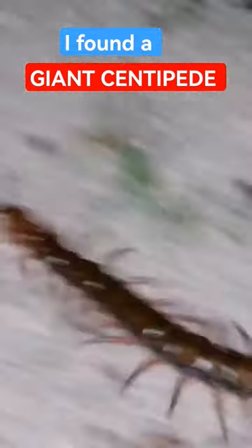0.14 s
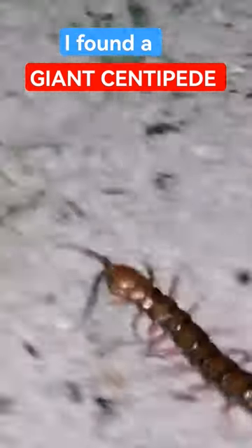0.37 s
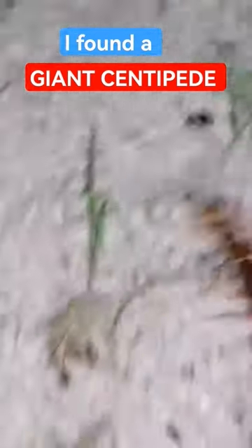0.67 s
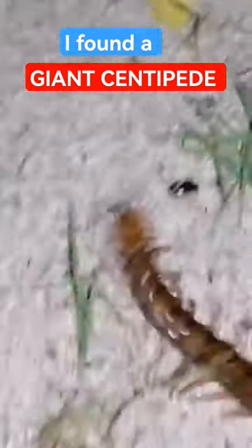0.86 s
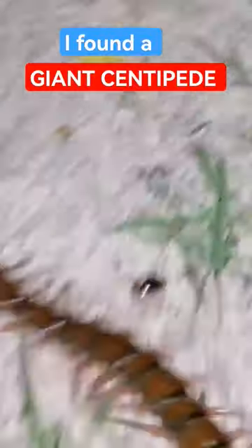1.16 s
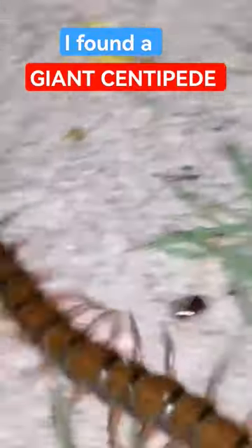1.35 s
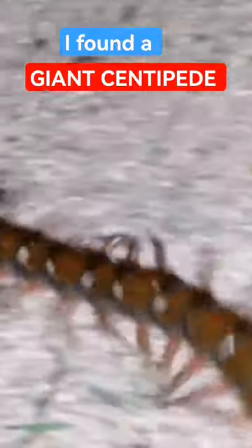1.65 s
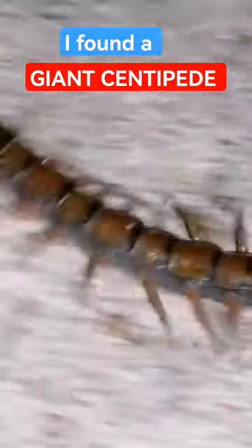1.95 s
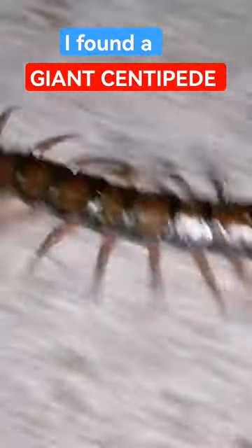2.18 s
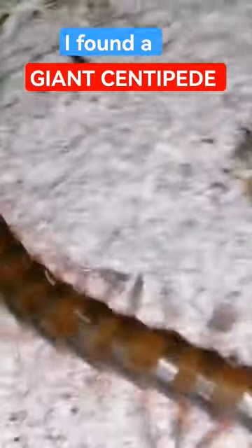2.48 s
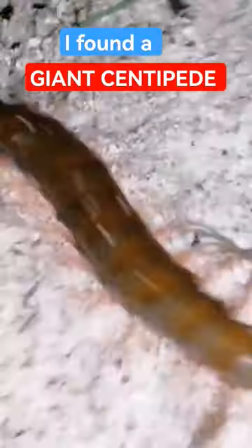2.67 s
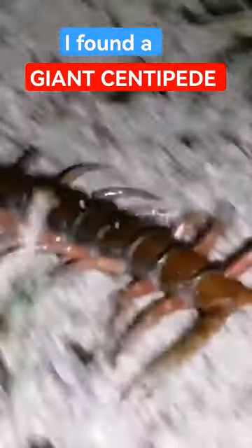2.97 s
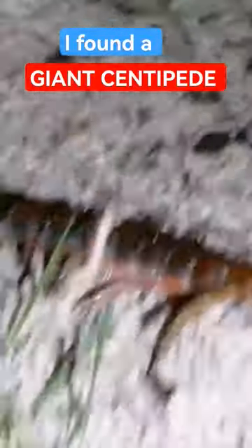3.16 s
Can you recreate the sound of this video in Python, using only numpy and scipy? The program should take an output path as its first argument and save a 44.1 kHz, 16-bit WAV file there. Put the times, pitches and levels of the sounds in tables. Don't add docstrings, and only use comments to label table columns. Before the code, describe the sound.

Shoe scuffs on gritty sand, close to a handheld phone outdoors at night. Crunchy drags with snapping grains come at 0.3-0.7 s and again at 1.1-1.3 s. From 1.4 to 2.5 s there are only weak drags, light breeze and soft handling thuds. Presses resume at 2.6 s, the hardest scrape hits at 2.84 s, then a dull thud at 2.94 s. Low traffic rumble, machine hum, thin hiss and very faint cricket chirps continue underneath; the sound is slightly muffled.

```python
import sys
import numpy as np
from scipy import signal
from scipy.fft import rfft, irfft
from scipy.io import wavfile

SR = 44100
rng = np.random.default_rng(int(sys.argv[2]) if len(sys.argv) > 2 else 0)


def materialize(psi):
    bounded = np.clip(np.atleast_2d(psi).T, -1, 1)
    quanta = np.round(bounded * 32767).astype(np.int16)
    wavfile.write(sys.argv[1], SR, quanta)


def field_ratio(decibels):
    return 10 ** (np.asarray(decibels, dtype=float) / 20)


N = 146412

# freq_hz, density_db_per_hz
RUMBLE_COLOUR = [(8.8, -44), (15, -9.5), (108, -1.5), (134, -1), (165, -3), (199, -8), (333, -21),
                 (538, -36.5), (900, -39.5), (1170, -53), (1980, -120)]
# time_s, level_db
BREEZE_LEVEL = [(0, -65), (.5, -68), (1.0, -57), (1.41, -50.5), (1.57, -64), (1.83, -54.5), (2.1, -62),
                (2.95, -58.5), (3.32, -61)]
# freq_hz, width_hz, level_db
HUM_LINES = [(68.6, 2, -56), (132.34, 2.3, -56), (88.1, 6.8, -60.5), (150.2, 3.3, -67), (208.9, 4.4, -67.5),
             (287.2, 5.5, -69), (325.3, 3, -71)]
# start_s, length_s, pitch_hz, level_db
CRICKET_CHIRPS = [
    (.16, .06, 7050, -77),
    (1.705, .09, 7060, -73),
    (2.18, .11, 7040, -78),
    (2.6, .05, 6750, -71),
]
# time_s, level_db
BUSTLE_LEVEL = [(0, -66), (.3, -64.5), (.5, -63.5), (1.04, -67), (1.3, -64), (1.85, -67.5), (2.0, -68.5),
                (2.17, -70), (2.33, -73), (2.48, -69.5), (2.6, -66.5), (2.95, -66.5), (3.32, -65.5)]
# freq_hz, density_db_per_hz
EARLY_AIR_COLOUR = [(240, -36), (400, -0.5), (613, -5.5), (906, -2.5), (1460, -4.5), (2820, -3),
                    (3970, -12.5), (6880, -8), (7400, -7.5), (9620, -26), (16300, -120)]
# freq_hz, density_db_per_hz
LATE_AIR_COLOUR = [(240, -18), (400, -3), (728, -25.5), (783, -19), (1410, -18), (1930, -12),
                   (4070, -18.5), (5190, -15.5), (7400, -13), (9620, -41), (16300, -120)]
# start_s, peak_db, pitch_hz, t60_s
HAND_THUDS = [(2.936, -30, 118, 0.055), (2.96, -38.5, 140, 0.13), (1.53, -40, 70, 0.17),
              (1.41, -40.5, 42, 0.18), (1.9, -37, 125, .1), (1.665, -44.5, 102, 0.088),
              (2.62, -45.5, 67, .2), (.66, -45, 81, 0.13), (1.3, -39.5, 130, 0.12), (1.815, -35, 90, 0.04),
              (1.96, -41, 65.5, .14), (1.085, -41, 77, 0.097), (.115, -44.5, 155, 0.1),
              (.488, -37, 96, 0.057), (0.12, -45, 64, 0.19), (1.375, -39.5, 150.5, 0.054),
              (1.745, -40.5, 100, 0.055), (1.425, -40, 140, 0.072), (1.47, -43.5, 190, .08),
              (3.0, -43.5, 80, 0.1), (3.145, -44, 169, 0.14)]
# start_s, peak_db, pitch_hz
GRAIN_SNAPS = [(.345, -45, 2000), (.3505, -45, 3000), (.4005, -45, 2500), (.419, -46, 1300),
               (.4305, -52, 3000), (.568, -32, 5000), (0.588, -38, 2900), (.596, -29.5, 2900),
               (.602, -43, 2600), (.658, -39, 5500), (1.128, -43, 2300), (1.1415, -34.5, 2500),
               (1.215, -46, 2200), (1.282, -45, 2300), (1.325, -48, 2500), (1.447, -52, 1150),
               (2.684, -50, 2400), (1.168, -43, 2500), (1.46, -47, 1500), (2.8206, -33.5, 3100),
               (2.834, -40, 5500), (2.8385, -30, 2300), (2.886, -50, 5540)]
# peak_s, length_s, pitch_hz, width_hz, level_db
SOLE_RINGS = [(0.338, 0.037, 1140, 89, -56.5), (0.369, 0.026, 1194, 89, -53), (.595, 0.045, 2900, 480, -46),
              (0.661, 0.053, 1020, 300, -53.5), (.597, 0.02, 1100, 250, -52), (.875, .04, 1580, 150, -66),
              (1.31, 0.087, 2310, 260, -60.5), (2.84, 0.016, 2250, 190, -45),
              (2.833, 0.022, 1170, 140, -51.5), (0.66, 0.041, 5500, 220, -64), (0.21, 0.35, 540, 270, -68),
              (0.383, 0.15, 575, 170, -61.5), (0.72, 0.11, 630, 220, -66), (1.125, 0.035, 540, 200, -63),
              (2.838, 0.025, 660, 200, -57.5), (2.7, 0.05, 2450, 250, -62), (2.645, .05, 2450, 230, -63.5),
              (2.635, .05, 3320, 230, -67.5), (2.83, .025, 3140, 440, -48), (2.78, .08, 2500, 300, -68),
              (.6, 0.045, 5500, 1100, -58), (1.465, 0.026, 1600, 500, -63.5), (0.356, .09, 1450, 830, -61),
              (0.557, 0.03, 3300, 210, -55), (.422, 0.033, 1200, 130, -56.5), (0.403, .05, 2300, 320, -61),
              (1.48, 0.15, 1340, 370, -62.5), (2.1, .3, 2300, 400, -77.5), (.585, 0.028, 3070, 400, -51.5),
              (1.2, 0.073, 1000, 210, -63.5), (1.136, 0.08, 2170, 870, -53),
              (1.205, 0.095, 2100, 700, -60.5), ]
# freq_hz, density_db_per_hz
GRIT_COLOUR = [(210, -47.5), (350, -19), (823, -7.5), (924, -9.5), (1840, -7.5), (2800, -5), (3910, -11),
               (5240, -2.5), (7400, -8.5), (9620, -46.5), (16300, -120)]
# peak_s, length_s, level_db, lows_db, highs_db (both relative to mids)
DRAGS = [(0.347, 0.086, -58, -3, -5.5), (.415, 0.093, -55.5, -2, 0), (0.592, 0.051, -51.5, -8, 4),
         (.665, 0.092, -57.5, -7, -0.5), (.8, 0.35, -76, 7, 8.5), (.975, 0.057, -76.5, -6, 8),
         (1.083, 0.062, -66.5, -11, -7), (1.135, 0.044, -49.5, -2.5, 1), (1.203, 0.073, -56.5, 0, -4),
         (1.318, 0.062, -60.5, -2.5, -5), (1.471, 0.3, -67, -1, -7.5), (1.652, 0.35, -69.5, -2.5, -4),
         (2.63, 0.1, -64.5, -16, -0.5), (2.8, 0.088, -65.5, -20, 1.5), (2.84, 0.032, -44.5, -11, 1),
         (2.882, 0.054, -54.5, -11, -1)]
# peak_s, length_s, level_db, lows_db, highs_db (both relative to mids)
SUDDEN_PRESSES = [(.2, 0.1, -70.5, 3, 1.5), (.562, 0.054, -56.5, -15, 6), (.6, 0.026, -50.5, -7, 0),
                  (.63, 0.022, -59.5, 2, -9), (.7295, 0.021, -58.5, 0.5, 2), (.87, 0.033, -68.5, 4.5, 6.5),
                  (.915, 0.021, -75, -8, 12), (1.102, 0.023, -59, -6, -6), (1.165, 0.047, -57, 2, 0),
                  (2.672, .016, -59.5, -7, 1), (2.61, 0.046, -71, -14, -4), (1.26, 0.08, -61.5, 1, -3),
                  (1.73, 0.13, -73, -4, 0.5), (2.52, 0.072, -73.5, -3, 4), (2.688, 0.029, -56.5, -8.5, 2.5),
                  (2.73, 0.061, -69, -3, -1), (2.822, 0.023, -47.5, -10.5, -3), (2.895, 0.076, -71, -11, 1)]
# freq_hz, gain_db
MIC_HOLLOW = [(20, -0.5), (3300, -0.5), (3500, 0), (3750, -3.5), (4200, -2), (4700, 0), (5500, 0.83),
              (20000, -0.5)]
# freq_hz, gain_db
IMAGE_RESPONSE = [(8000, 2), (11200, -1), (11700, -14), (12400, -15), (12900, -12), (14300, -13),
                  (15400, -14.5), (15900, -31)]

DRAG_RISE_SHARE, PRESS_RISE_SHARE = 0.7, 0.26


def rms_one(x):
    return x / np.sqrt(np.mean(x ** 2) + 1e-20)


def colour(x, points):
    hz, db = np.transpose(points)
    f = np.maximum(np.fft.rfftfreq(N, 1 / SR), 1)
    below_db = 30 * np.log2(np.minimum(f / hz[0], 1))
    above_db = -6 * np.log2(np.maximum(f / hz[-1], 1))
    gain_db = np.interp(np.log(f), np.log(hz), db) + below_db + above_db
    return rms_one(irfft(rfft(x) * field_ratio(gain_db), N))


def shade(x, points):
    f = np.maximum(np.fft.rfftfreq(2 * N, 1 / SR), 1)
    hz, db = np.transpose(points)
    gain_db = np.interp(np.log(f), np.log(hz), db)
    return irfft(rfft(x, 2 * N) * field_ratio(gain_db))[:, :N]


def cut(x, hz, kind, order=4):
    return signal.sosfilt(signal.butter(order, hz, kind, fs=SR, output="sos"), x)


def drift(rate_hz):
    r = np.exp(-2 * np.pi * rate_hz / SR)
    return rms_one(signal.lfilter([1], [1, -2 * r, r * r], rng.standard_normal(N + SR))[SR:])


def level_at(points):
    return np.interp(np.arange(N) / SR, *np.transpose(points))


def ring(x, hz, t60_s):
    r, w = field_ratio(-60 / (t60_s * SR)), 2 * np.pi * hz / SR
    return signal.lfilter([0, np.sin(w)], [1, -2 * r * np.cos(w), r * r], x + 1e-18)


def soft_hit(start_s, hz, yield_t60_s, t60_s):
    click = np.zeros(N)
    click[int(start_s * SR)] = 1
    body = ring(ring(click, hz, yield_t60_s), hz, t60_s)
    return body / np.abs(body).max()


def stroke(peak_s, length_s, rise_share=DRAG_RISE_SHARE):
    t = np.arange(N) / SR - peak_s
    side_s = length_s * np.where(t < 0, rise_share, 1 - rise_share)
    return np.exp(-np.abs(t / side_s) ** 1.9)


def traffic_rumble():
    level_db = -49.5 + 0.5 * drift(4.5)
    return field_ratio(level_db) * cut(colour(rng.standard_normal(N), RUMBLE_COLOUR), 45, "high")


def breeze():
    gust = cut(rng.standard_normal(N + SR), [15, 48], "band", order=2)[SR:]
    return field_ratio(level_at(BREEZE_LEVEL)) * rms_one(gust)


def machine_hum():
    t, steady_db = np.arange(N) / SR, 1
    out = np.zeros(N)
    for hz, width_hz, db in HUM_LINES:
        waver = rms_one(ring(rng.standard_normal(N + SR), hz, 2.0 / width_hz)[SR:])
        core = np.sin(2 * np.pi * (hz * t + rng.random()))
        out += field_ratio(db - 2.5) * (waver + field_ratio(steady_db) * core)
    return out


def cricket():
    pulses_per_s, t60_s, fade_db = 52, 0.026, 12
    out = np.zeros(N)
    for start_s, length_s, hz, db in CRICKET_CHIRPS:
        clicks = np.zeros(N)
        at_s = np.arange(0, length_s, 1 / pulses_per_s)
        clicks[((start_s + at_s) * SR).astype(int)] = field_ratio(db + 10.5 - fade_db * at_s / length_s)
        out += ring(ring(clicks, hz, t60_s), hz, t60_s) / (t60_s * SR / 40)
    return out


def clothes_bustle():
    turn_s, turn_length_s, patchy_db = 2.58, 1, 0.7
    late = np.clip((np.arange(N) / SR - turn_s) / turn_length_s + 0.5, 0, 1)
    white = rng.standard_normal(N)
    early_air = (1 - late) * colour(white, EARLY_AIR_COLOUR)
    late_air = late * colour(white, LATE_AIR_COLOUR)
    return rms_one(early_air + late_air) * field_ratio(level_at(BUSTLE_LEVEL) + patchy_db * drift(6.0))


def hand_thuds():
    out, yield_share = np.zeros(N), 0.46
    for start_s, db, hz, t60_s in HAND_THUDS:
        out += field_ratio(db) * soft_hit(start_s, hz, yield_share * t60_s, t60_s)
    return out


def grain_snaps():
    out, cycles = np.zeros(N), 4.2
    for start_s, db, hz in GRAIN_SNAPS:
        out -= field_ratio(db) * soft_hit(start_s, hz, cycles / hz, cycles / hz)
    return out


def grit():
    grains_per_s, spread_db, ring_cycles, smooth_share = 12000, 2.2, 14.0, 0.55
    patchy_db, patches_per_s, modes = 1.5, 11, 30
    sizes = field_ratio(spread_db * np.minimum(rng.exponential(1, N), 5)) * rng.choice([-1, 1], N)
    cracks = rms_one(sizes * (rng.random(N) < grains_per_s / SR))
    push = np.sqrt(1 - smooth_share) * cracks + np.sqrt(smooth_share) * rng.standard_normal(N)
    mode_of_sample = rng.integers(0, modes, N)
    out = np.zeros(N)
    for k, hz in enumerate(np.geomspace(400, 9000, num=modes)):
        body = ring(push * (mode_of_sample == k), hz, ring_cycles / hz)
        out += body * hz * field_ratio(patchy_db * drift(patches_per_s))
    return rms_one(out)


def sole_rings(raw_grit):
    out = np.zeros(N)
    for peak_s, length_s, hz, width_hz, db in SOLE_RINGS:
        out += field_ratio(db) * stroke(peak_s, length_s) * rms_one(ring(raw_grit, hz, 2.4 / width_hz))
    return out


def scuffs(raw_grit):
    stutter_db, stutter_per_s = 1, 43
    sand = colour(raw_grit, GRIT_COLOUR)
    lows = cut(sand, [693, 1700], "band", order=3)
    mids = cut(sand[::-1], [1700, 3800], "band", order=5)
    highs = cut(sand, 4000, "high")
    power = np.zeros((3, N))
    for rows, rise_share in ((DRAGS, DRAG_RISE_SHARE), (SUDDEN_PRESSES, PRESS_RISE_SHARE)):
        for peak_s, length_s, db, low_db, high_db in rows:
            band_db = db + np.array([[low_db], [0], [high_db]])
            power += (field_ratio(band_db) * stroke(peak_s, length_s, rise_share)) ** 2
    out = np.zeros(N)
    for band, band_power in zip((lows, mids, highs), power):
        out += rms_one(band) * np.sqrt(band_power) * field_ratio(stutter_db * drift(stutter_per_s))
    return out


def scene():
    closing = np.sin(np.pi / 2 * np.minimum(np.arange(N)[::-1] / (0.006 * SR), 1)) ** 2
    far = (traffic_rumble() + breeze() + machine_hum()) * closing
    raw_grit = grit()
    shoes = grain_snaps() + sole_rings(np.roll(raw_grit, N // 3)) + scuffs(raw_grit)
    return (far + cricket() + clothes_bustle() + hand_thuds() + shoes)[None]


def low_pass(x):
    return signal.sosfilt(signal.butter(12, 15700, fs=SR, output="sos"), x)


def record(dry):
    cut_hz, inner_rate_hz, image_db, circuit_db = 7280, 16000, -32, -96
    steep = signal.cheby1(12, 0.5, cut_hz, fs=SR, output="sos")
    kept = signal.sosfilt(steep, shade(dry, MIC_HOLLOW))
    carrier = np.cos(2 * np.pi * inner_rate_hz * np.arange(N) / SR)
    image = shade(cut(kept, 500, "high") * carrier, IMAGE_RESPONSE)
    mix = kept + field_ratio(image_db) * image + field_ratio(circuit_db) * rng.standard_normal(dry.shape)
    return low_pass(mix)


dry = scene()
out = record(dry)
materialize(out)
```